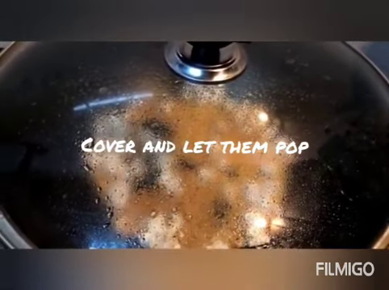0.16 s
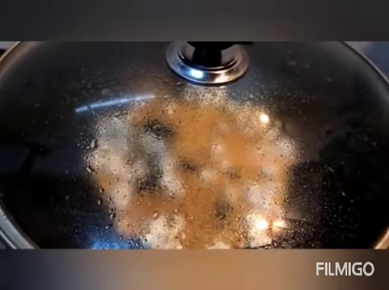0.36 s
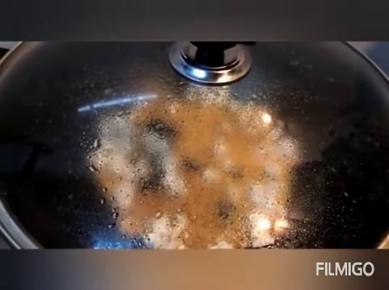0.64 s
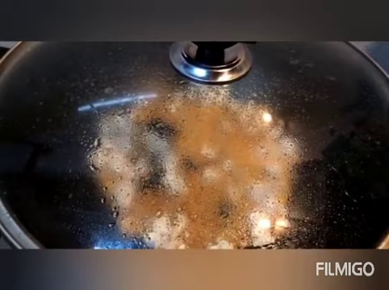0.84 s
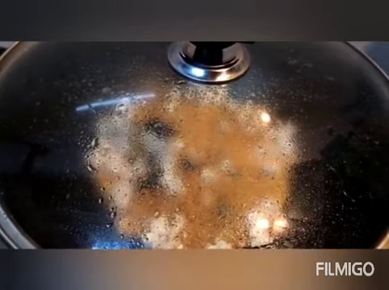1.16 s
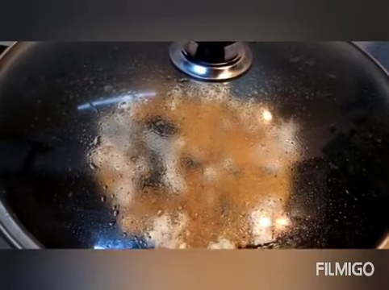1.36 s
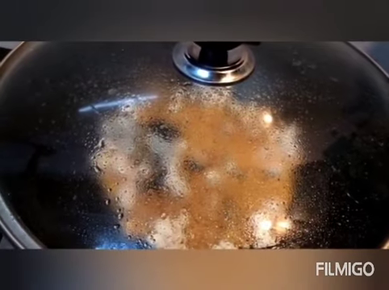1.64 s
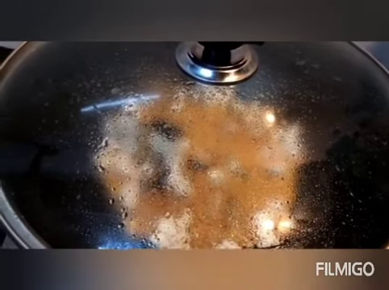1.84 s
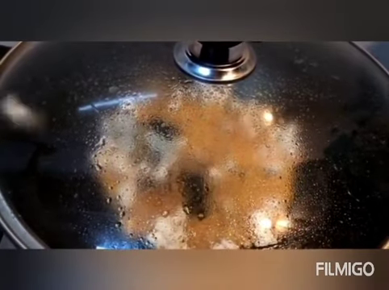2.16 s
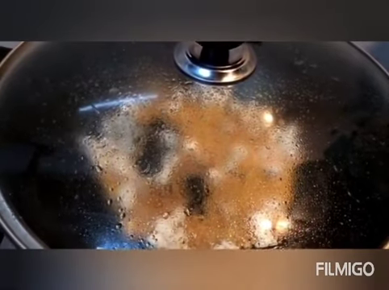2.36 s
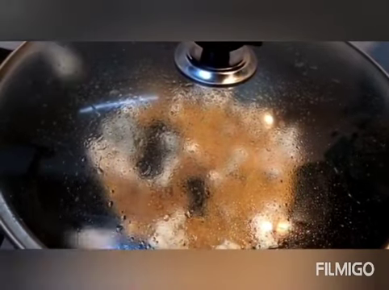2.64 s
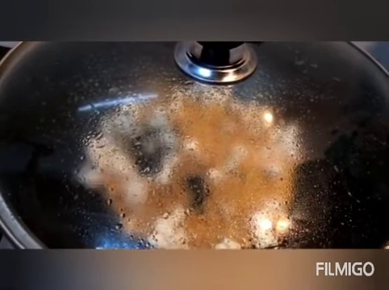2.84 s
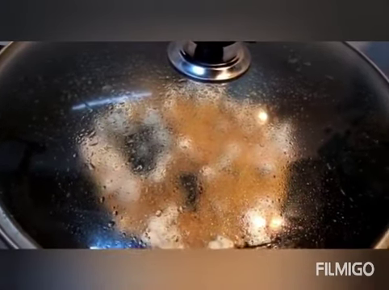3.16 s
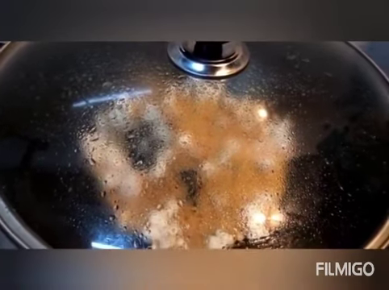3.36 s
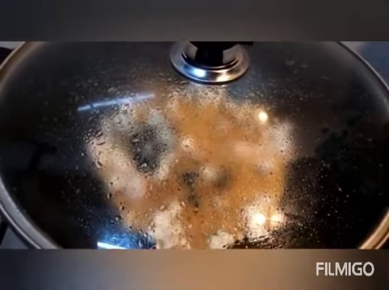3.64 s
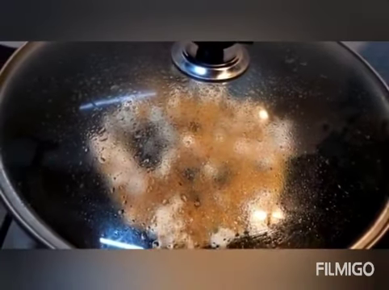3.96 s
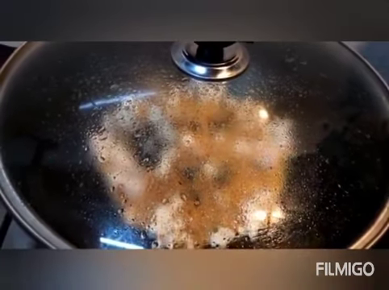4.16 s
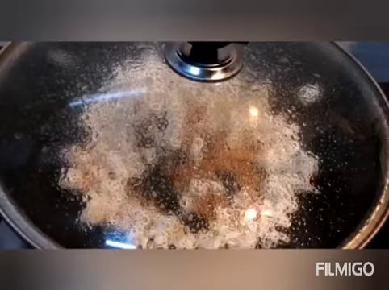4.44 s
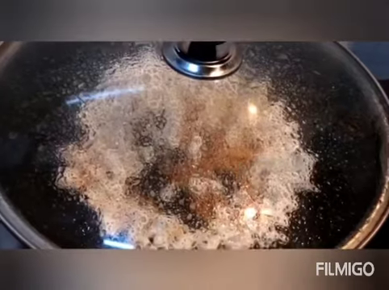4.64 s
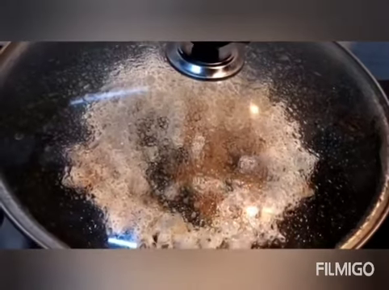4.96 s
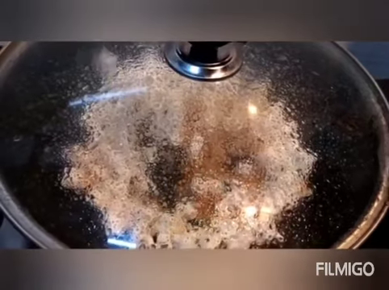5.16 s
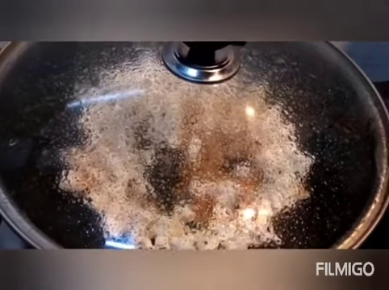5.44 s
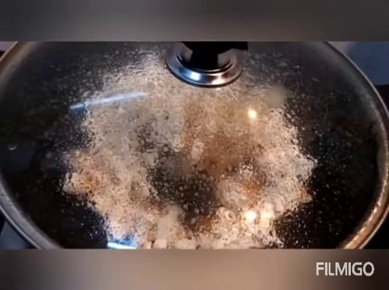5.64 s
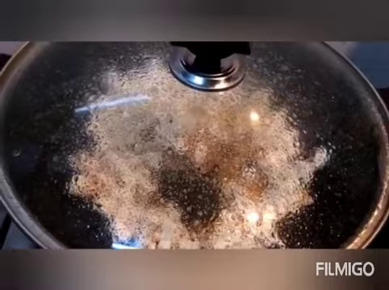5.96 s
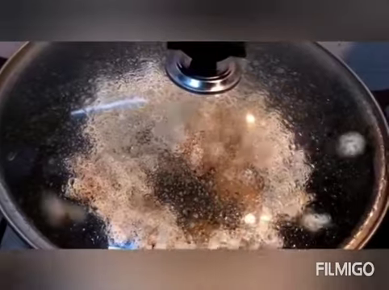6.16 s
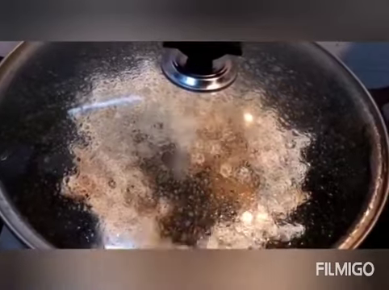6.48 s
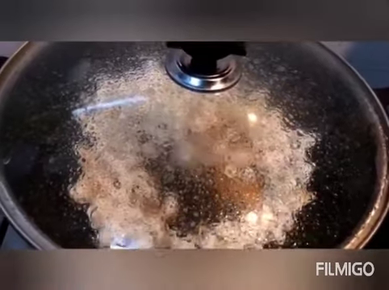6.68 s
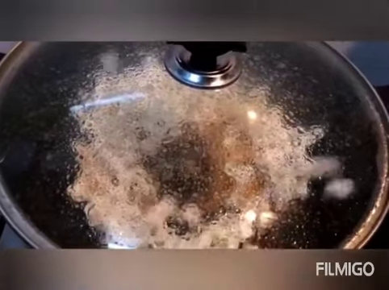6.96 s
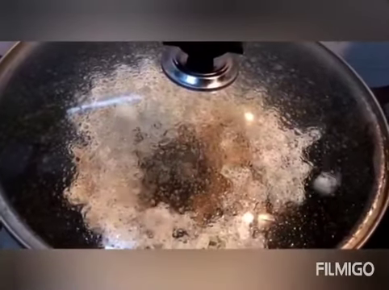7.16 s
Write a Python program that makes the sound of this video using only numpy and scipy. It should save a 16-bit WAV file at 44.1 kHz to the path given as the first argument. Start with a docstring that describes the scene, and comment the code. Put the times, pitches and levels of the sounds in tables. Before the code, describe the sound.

Kernels burst in a covered pan over faint sizzle and low stove rumble, slowly at first, then fuller, duller and in quick succession.

```python
"""In a small kitchen, popcorn pops in hot oil in a frying pan under a glass lid.
Each burst is a spit, a puff of steam and a thump made of shaped noise; the thump also rings the pan's low notes.
Kernels and hulls tick against lid and wall as short noise bands, and the space under the lid rings after them.
Noise makes the faint sizzle, the stove's rumble and one whistling gust of steam; a drone is built from sines.
After a brief dropout the pan is mostly full: pops thump more and spit less, and the ticks are duller."""
import sys
import numpy as np
from scipy import signal
from scipy.fft import rfft, irfft
from scipy.io import wavfile

SR = 44100
rng = np.random.default_rng(int(sys.argv[2]) if len(sys.argv) > 2 else 0)


def wav_record(signal):
    """Record a signal, one row per channel, as 16-bit PCM in the file named by sys.argv[1]."""
    frames = np.transpose(np.atleast_2d(signal))
    bounded = np.clip(frames, -1, 1)
    # unit amplitude maps onto the largest positive 16-bit level
    quanta = np.round(bounded * 32767).astype(np.int16)
    wavfile.write(sys.argv[1], SR, quanta)


N = 322371

# How full of popcorn the pan is: (time [s], filling [0 nearly bare - 1 full])
FILLING = [(0, 0), (4.19, 0), (4.23, .75), (7.31, 1)]

# Slow swing in level of the steady background noise, before each layer takes its share: (time [s], swing [dB])
BACKGROUND_SWING = [(0, 2), (1.7, -3.5), (4.3, 1), (5.4, -12), (6.1, 7), (7.31, 1)]
# Colours of the noise layers: (frequency [Hz], relative density [dB per Hz])
RUMBLE_COLOUR = [(12, -40.5), (24, -19.5), (40, 10), (60, 3), (105, 3.5), (130, -3.5), (162, -9),
                 (241, 0.5), (300, -14), (361, -5.5), (500, -15.5), (800, -67.5)]
HISS_COLOUR = [(260, -34.5), (450, -5.5), (578, -3), (630, -3), (875, -7), (1380, -9), (2550, -10.5),
               (4500, -26.5), (5850, -59), (9900, -120)]
SIZZLE_COLOUR = [(2060, -37), (3500, -6), (3780, -16), (4080, -14.5), (4630, -9.5), (5530, -6.5),
                 (7460, -10), (8100, -12), (8910, -12), (9680, -12), (11300, -13.5), (14100, -16),
                 (16000, -35.5)]
# Each layer: (level [dB], share of the swing)
RUMBLE_LEVEL, HISS_LEVEL, SIZZLE_LEVEL = (-54.5, 0.42), (-60.5, 0.69), (-69.5, 0.47)

# Notes within the drone: (multiple of its pitch, relative level [dB])
DRONE_ORDERS = [(2, 0.5), (3, -1.5), (5, -5), (7, -15.5), (11, -9.5)]
# The drone creeps up in pitch, holds its level, then fades
DRONE_HZ, DRONE_RISE_HZ_PER_S = 32.3, 1
DRONE_DB, DRONE_HOLD_S, DRONE_FALL_DB_PER_S = -57, 3, 21

# One gust of steam spatters the oil and whistles at the rim
GUST_S, GUST_RISE_S = 0.5, 0.17
# Its two parts: (peak level [dB], fall [dB per s])
WHISTLE_LEVEL, SPATTER_LEVEL = (-65.5, 7.8), (-56.5, 46)
# Resonances of the gap at the rim: (frequency [Hz], width [Hz], relative level [dB])
RIM_WHISTLES = [(4560, 260, 1.5), (6160, 350, 0), (7300, 250, -7.5), (8950, 300, -23.5)]

# Kernels and hulls striking lid and wall:
# (time [s], level [dB], pitch of the struck spot [Hz], crunch [0 clean - 1 widest band])
TICKS = [(0.525, -52.5, 6740, .95), (0.657, -55, 3020, 0.77), (0.693, -51, 4530, 0.67),
         (0.789, -60, 5000, 0.3), (0.844, -57.5, 860, 0), (1.3, -56.5, 900, 0.1),
         (2.007, -42.5, 1920, 0.64), (2.08, -29.5, 7260, 0.73), (2.204, -41, 5260, 0),
         (2.223, -33, 6900, 0.17), (2.434, -43.5, 2100, 0.34), (2.75, -51.5, 5100, 0.33),
         (3.255, -43.5, 1980, .25), (3.364, -60, 5040, 0.24), (3.772, -18.5, 6440, 0.67),
         (3.795, -24, 7840, 0.9), (3.922, -40.5, 2350, 0), (3.93, -35, 6700, 0.92),
         (3.942, -37.5, 2925, .7), (4.119, -26.5, 7730, 0.22), (4.205, -41, 2150, 0.4),
         (4.386, -49.5, 2260, 0.67), (4.495, -45.5, 5100, 0.04), (4.585, -13, 2050, .6),
         (4.702, -31, 2210, 1), (4.835, -45, 796, .03), (4.937, -19.5, 3120, 0.46),
         (5.521, -32, 2430, 0.13), (5.546, -24.5, 2500, 0.75), (5.634, -38.5, 5840, 0.9),
         (5.777, -52, 5400, 0.13), (5.856, -43.5, 5660, 0.8), (6.038, -22, 3750, .75),
         (6.063, -33, 2850, 0.2), (6.388, -31.5, 2760, 0.78), (6.49, -36, 6800, 0.44),
         (6.532, -41, 6000, 0.5), (6.565, -35, 2600, 1), (6.953, -36, 5470, 0.06)]
# A clean tick stays within this ratio of its pitch, plus a margin
CLEAN_RATIO, CLEAN_MARGIN_HZ = 1.136, 336
# Crunch widens it toward a low edge, which rises by an octave per 27 dB of level,
# and a high edge: (bare pan [Hz], full pan [Hz])
CRUNCH_LOW_HZ, LOW_EDGE_DB_PER_OCTAVE, CRUNCH_HIGH_HZ = 1136, 27, (12500, 5730)
# Bright snap within every tick: (bare pan [dB], full pan [dB])
SNAP_DB = (-14.5, -21)
# Above the splinter level, the snap gains this many dB per dB of blow
SPLINTER_DB, SPLINTER_GAIN = -16.5, 3.53
# A blow of this level drives the lid at unit gain; harder ones lose this share of their excess
RING_EVEN_DB, RING_LOSS = -28, 0.16

# Ringing of the lid and the air under it: (frequency [Hz], relative level [dB], time to fall by 60 dB [s])
LID_MODES = [(1310, 0, .25), (1701, 0, .5), (1773, 0, .5), (1895, -4, .45), (2073, 1, .45), (2320, -1, .5),
             (2611, -3, .4), (2658, -2, .45), (2778, -3, .45), (3212, -2, .35), (3466, -4, .4),
             (3879, -6, .3)]
# Strength of the dense echoes after each blow: (frequency [Hz], relative level [dB])
ECHO_COLOUR = [(100, -5.5), (300, -2.5), (500, 2.5), (900, 3), (1400, -0.5), (1900, -2.5), (2800, 1),
               (4000, -8), (5000, -5), (7000, -4.5), (11000, 2.5), (15500, -5.5)]
# How long those echoes last: (frequency [Hz], time to fall by 60 dB [s])
ECHO_T60 = [(100, 0.72), (700, 0.78), (2300, 0.49), (5000, 0.5), (9000, 0.27), (15000, 0.19)]
# Level of the slight treble spread between left and right: (bare pan [dB], full pan [dB])
SPREAD_DB = (-18, -36.5)

# Kernels bursting: (time [s], force [dB], puff of steam [dB])
BURSTS = [(1.936, -45, -42), (2.044, -40.5, -34.5), (2.368, -38, -42.5), (2.554, -48, -47.5),
          (3.219, -44.5, -43), (3.706, -48.5, -44), (4.564, -37, -34.5), (4.905, -35, -32.5),
          (5.501, -39.5, -33.5), (5.859, -49, -49), (5.924, -39, -35.5), (6.113, -39.5, -37),
          (6.329, -38, -40.5), (6.547, -34, -31.5), (6.867, -43, -40.5), (7.001, -38, -36.5),
          (7.231, -38.5, -37)]
# Parts of a burst relative to its force: (bare pan [dB], full pan [dB])
SPIT_DB, THUMP_DB = (5, 0.5), (0.7, 4)
# Low notes of the pan on the burner: (frequency [Hz], relative level [dB], time to fall by 60 dB [s])
PAN_MODES = [(45, -9.5, 0.58), (74.4, 1.5, 0.19), (108, 1, 0.49), (135, -13, 0.37), (162, 2, .1),
             (209, -2, 0.61), (250, 1, 0.4), (274.7, -11, 0.84), (447, -7, 0.13), (562, -20.5, 0.17),
             (727, -3, 0.074), (892, -9.5, 0.35)]

# One dull bump: (time [s], frequency [Hz], time to fall by 60 dB [s])
BUMP = (4.111, 180, .36)
BUMP_DB = -37

# Soft, freshly opened kernels knocking the lid just after they burst: (time [s], level [dB])
KNOCKS = [(5.501, -33.5), (5.94, -46), (6.14, -35), (6.343, -35.5), (7.007, -42), (7.023, -34),
          (7.252, -36)]
# Hollow note of such a knock: (frequency [Hz], relative level [dB], time to fall by 60 dB [s])
KNOCK_MODES = [(962, -16, 0.061), (1322, 6.5, 0.062), (1430, -2, 0.068), (1530, -23, 0.11),
               (2200, -3, 0.068)]

# The sound drops out briefly: (time [s], gain [dB])
DROPOUT = [(4.165, 0), (4.168, -14), (4.184, -22), (4.188, -70), (4.232, -70), (4.234, 0)]
CUTOFF_HZ = 16000


def from_db(db):
    """Turns decibels into a plain multiplier."""
    return 10 ** (np.asarray(db) / 20)


def rms_one(x):
    """Scales a sound to an average strength (rms) of 1."""
    return x / np.sqrt(np.mean(x ** 2) + 1e-20)


def in_time(rows):
    """Draws a table of (time, value) as a curve with one value per sample."""
    s, values = np.transpose(rows)
    return np.interp(np.arange(N) / SR, s, values)


def at_hz(points, hz):
    """Reads a table between its frequencies, with octaves evenly spaced."""
    f, value = np.transpose(points)
    return np.interp(np.log(np.maximum(hz, 1)), np.log(f), value)


def by_filling(pair, s):
    """Moves from the first value in the bare pan to the second in the full pan."""
    bare, full = pair
    return bare + (full - bare) * np.interp(s, *np.transpose(FILLING))


def band(x, low_hz, high_hz, order=2):
    """Keeps the frequencies between two edges; a higher order cuts more steeply."""
    low = np.clip(low_hz, 10, SR / 3)
    high = np.clip(high_hz, low * 1.1, SR * 0.47)
    return signal.sosfilt(signal.butter(order, [low, high], "band", fs=SR, output="sos"), x)


def add(track, s, sound):
    """Mixes a sound into a track at a time in seconds."""
    start = max(round(s * SR), 0)
    track[start:start + len(sound)] += sound[:max(N - start, 0)]


def noise(spectrum):
    """Steady noise of a given colour, at rms 1."""
    hz = np.arange(N // 2 + 1) * SR / N
    coloured = rfft(rng.standard_normal(N)) * from_db(at_hz(spectrum, hz))
    return rms_one(irfft(coloured, N))


def ringing(modes):
    """A struck body rings as fading sines: one second of them, alternating in sign."""
    t = np.arange(SR) / SR
    out = np.zeros(SR)
    for k, (hz, db, t60) in enumerate(modes):
        out += (-1) ** k * from_db(db - 60 * t / t60) * np.sin(2 * np.pi * hz * t)
    return out


def crack(low_hz, high_hz, rise_s, decay_s, skirt_db, pitch_hz=0, pitch_db=0):
    """A cluster of tiny fractures: noise that swells and dies, with the energy of 10 ms at rms 1."""
    t = np.arange(SR // 8) / SR
    swell = (1 - np.exp(-(t / rise_s) ** 2)) * np.exp(-t / decay_s)
    grains = rng.standard_normal(len(t)) * swell
    core = band(grains, low_hz, high_hz, order=3)
    # a gently sloping skirt reaches an octave beyond the core on either side
    skirt = band(grains, low_hz * 0.5, high_hz * 2, order=1)
    sound = core + from_db(skirt_db) * skirt
    if pitch_hz:    # a broad resonance around one pitch
        ping = band(rng.standard_normal(len(t)) * swell, pitch_hz * 0.9, pitch_hz * 1.1)
        sound = rms_one(sound) + from_db(pitch_db) * rms_one(ping)
    return sound / np.sqrt(np.sum(sound ** 2) / (SR / 100))


def gust(peak_db, fall_db_per_s):
    """Loudness of the gust of steam: a swell, then a steady fade."""
    age = np.arange(N) / SR - GUST_S
    rise = np.clip(age / GUST_RISE_S, 0, 1)
    return rise * from_db(peak_db - fall_db_per_s * np.maximum(age - GUST_RISE_S, 0))


def stove():
    """Burner rumble, soft hiss, and fine bubbles in the oil, which the gust stirs up."""
    swing_db = in_time(BACKGROUND_SWING)
    levels = (RUMBLE_LEVEL, HISS_LEVEL, SIZZLE_LEVEL)
    rumble, hiss, sizzle = [from_db(db + share * swing_db) for db, share in levels]
    spatter = gust(*SPATTER_LEVEL)
    # mostly slow random flicker in the sizzle's level
    fizz = from_db(1.2 * noise([(10, 11), (200, 2.5), (2000, -71.5)]))
    stirred_hiss = np.hypot(hiss, spatter)
    stirred_sizzle = np.hypot(sizzle, from_db(-3.5) * spatter) * fizz
    return rumble * noise(RUMBLE_COLOUR) + stirred_hiss * noise(HISS_COLOUR) + stirred_sizzle * noise(SIZZLE_COLOUR)


def drone():
    """A few low harmonics, each wavering in level, on one slowly rising pitch."""
    t = np.arange(N) / SR
    phase = 2 * np.pi * np.cumsum(DRONE_HZ + DRONE_RISE_HZ_PER_S * t) / SR
    level_db = DRONE_DB - DRONE_FALL_DB_PER_S * np.maximum(t - DRONE_HOLD_S, 0)
    slow = [(2, 0), (8, -20), (40, -90)]
    notes = np.zeros(N)
    for k, db in DRONE_ORDERS:
        notes += from_db(db + 3.1 * noise(slow)) * np.sin(k * phase)
    return from_db(level_db) * notes


def steam():
    """Steam leaking past the rim whistles: one noisy jet excites several narrow bands."""
    jet = rng.standard_normal(N)
    whistles = np.zeros(N)
    for hz, width_hz, db in RIM_WHISTLES:
        whistles += from_db(db) * band(jet, hz - width_hz / 2, hz + width_hz / 2, order=1)
    return gust(*WHISTLE_LEVEL) * rms_one(whistles)


def ticks():
    """Hard, short contacts, in bands widened by crunch: the direct sound, and what sets the lid ringing."""
    direct, drive = np.zeros(N), np.zeros(N)
    for s, db, pitch_hz, crunch in TICKS:
        clean_low = max(pitch_hz / CLEAN_RATIO - CLEAN_MARGIN_HZ, 20)
        clean_high = pitch_hz * CLEAN_RATIO + CLEAN_MARGIN_HZ
        widest_low = CRUNCH_LOW_HZ * 2 ** ((db - RING_EVEN_DB) / LOW_EDGE_DB_PER_OCTAVE)
        widest_high = by_filling(CRUNCH_HIGH_HZ, s)
        low_hz = clean_low * (widest_low / clean_low) ** crunch
        high_hz = clean_high * (widest_high / clean_high) ** crunch
        # the harder the blow, the more the spot rings
        pitch_db = -2.5 + 0.14 * (db - RING_EVEN_DB)
        # every tick has a bright snap, which grows stronger above the splinter level
        snap_db = by_filling(SNAP_DB, s) + SPLINTER_GAIN * max(db - SPLINTER_DB, 0)
        contact = crack(low_hz, high_hz, rise_s=0.0018, decay_s=0.0041, skirt_db=-18.5,
                        pitch_hz=pitch_hz, pitch_db=pitch_db)
        snap = crack(3100, 9200, rise_s=0.002, decay_s=0.003, skirt_db=-17.5)
        tick = from_db(db) * (contact + from_db(snap_db) * snap)
        start_s = s - 0.0008    # a little early, as the crack takes time to swell
        add(direct, start_s, tick)
        add(drive, start_s, from_db(RING_LOSS * (RING_EVEN_DB - db)) * tick)
    return direct, drive


def reverberation():
    """Dense echoes as noise that dies band by band, at about unit gain."""
    t = np.arange(SR) / SR
    edges = np.geomspace(60, 17000, 17)
    out = np.zeros(SR)
    for low, high in zip(edges, edges[1:]):
        hz = np.sqrt(low * high)
        tail = band(rng.standard_normal(SR), low, high, order=3)
        out += tail * from_db(at_hz(ECHO_COLOUR, hz) - 60 * t / at_hz(ECHO_T60, hz))
    onset = 1 - np.exp(-t / 0.0017)
    return out * onset / np.sqrt(SR / 20)


def under_lid(drive, wet_db, lid_db):
    """The lid and the air under it ring on after each blow: every sample starts echoes and lid notes."""
    response = from_db(wet_db) * reverberation() + from_db(lid_db) * ringing(LID_MODES)
    return signal.fftconvolve(drive, response)[:N]


def treble_spread(cracks):
    """Slight treble spread of the cracks, delayed and opposite in left and right; narrower in the full pan."""
    late = np.pad(cracks, (SR // 700, 0))[:N]
    spread_db = by_filling(SPREAD_DB, np.arange(N) / SR)
    opposite = np.array([[1], [-1]])
    return from_db(spread_db) * band(late, 5500, 15000, order=5) * opposite


def bursts():
    """The hull tears with a bright spit, steam puffs out, and the recoil shoves the pan into ringing."""
    air, shove = np.zeros(N), np.zeros(N)
    for s, force_db, puff_db in BURSTS:
        spit = from_db(force_db + by_filling(SPIT_DB, s))
        thump = from_db(force_db + by_filling(THUMP_DB, s))
        add(air, s, spit * crack(3900, 7940, rise_s=0.0015, decay_s=0.0053, skirt_db=-3))
        puff = crack(290, 3400, rise_s=0.0021, decay_s=0.014, skirt_db=-18.5, pitch_hz=558, pitch_db=-22)
        add(air, s, from_db(puff_db) * puff)
        add(air, s, thump * crack(71, 270, rise_s=0.0045, decay_s=0.014, skirt_db=-22.5))
        add(shove, s + 0.00232, [thump])    # a single-sample push
    pan = from_db(-3) * signal.fftconvolve(shove, ringing(PAN_MODES))[:N]
    return air, pan


def crumbs(count, level_db, spread_db, fall_s):
    """Each burst scatters bits of hull and drops of oil that land a little later, the last ones softly."""
    out = np.zeros(N)
    all_chances = rng.random((len(BURSTS), count, 3))
    for (s, force_db, _), chances in zip(BURSTS, all_chances):
        for when, size, pitch in chances:
            db = force_db + level_db - spread_db * (when + size) / 2
            low_hz = 1200 * 2 ** (2 * pitch)
            speck = crack(low_hz, 2 * low_hz, rise_s=0.00052, decay_s=0.0051, skirt_db=-10.5)
            add(out, s + 0.014 + fall_s * when ** 2, from_db(db) * speck)
    return out


def bump():
    """A single low ring: one fading sine."""
    s, hz, t60 = BUMP
    out = np.zeros(N)
    add(out, s, ringing([(hz, BUMP_DB, t60)]))
    return out


def knocks():
    """A padded contact gives a soft crunch and a short hollow note."""
    crunch, hollow = np.zeros(N), np.zeros(N)
    note = ringing(KNOCK_MODES)
    for s, db in KNOCKS:
        add(hollow, s, from_db(db) * note)
        soft_crack = crack(900, 5000, rise_s=0.0042, decay_s=0.014, skirt_db=-28)
        add(crunch, s, from_db(db - 9.5) * soft_crack)
    return crunch, hollow


def scene():
    """Adds all sources; bursts, ticks, crumbs and the crunch of knocks also ring under the lid."""
    air, thumps = bursts()
    direct, drive = ticks()
    crunch, hollow = knocks()
    soft = air + crunch + crumbs(count=6, level_db=-2, spread_db=13, fall_s=0.19)
    pops = soft + direct + hollow + under_lid(soft + drive, wet_db=1, lid_db=-54.5)
    return pops + treble_spread(air + direct) + thumps + bump() + steam() + stove() + drone()


def record(dry):
    """Loud peaks are rounded; the microphone dulls the high treble; the sound drops out once; the top is cut."""
    rounded = 0.7 * np.tanh(dry / 0.7)
    dulled = signal.sosfilt(signal.butter(4, 13000, fs=SR, output="sos"), rounded)
    with_dropout = dulled * from_db(in_time(DROPOUT))
    top_cut = signal.ellip(10, 0.1, 90, CUTOFF_HZ, fs=SR, output="sos")
    return signal.sosfilt(top_cut, with_dropout)


dry = scene()
out = record(dry)
wav_record(out)
```